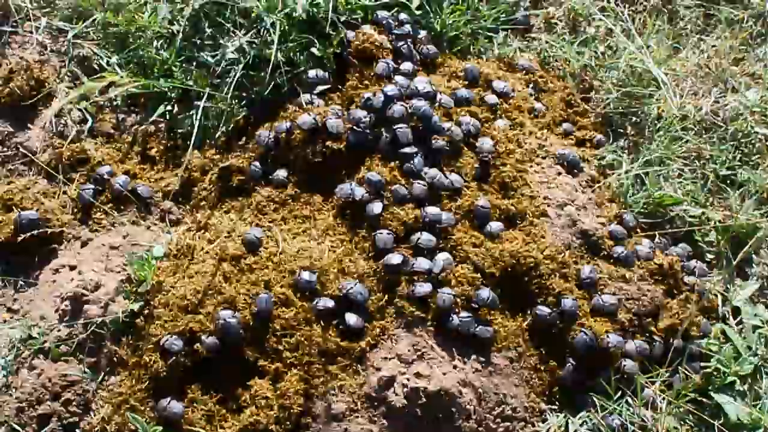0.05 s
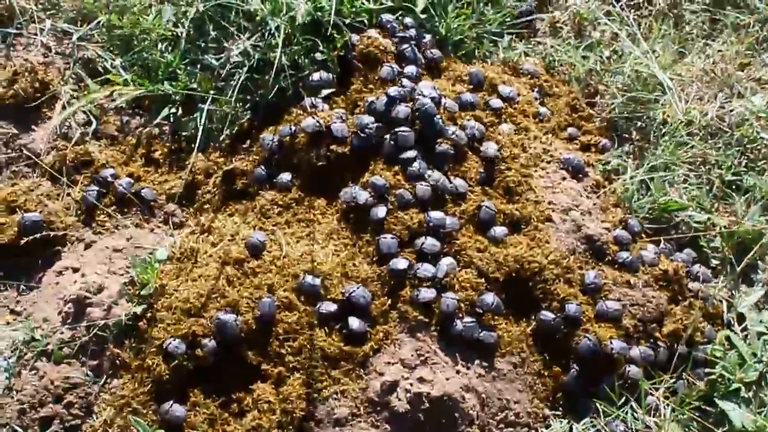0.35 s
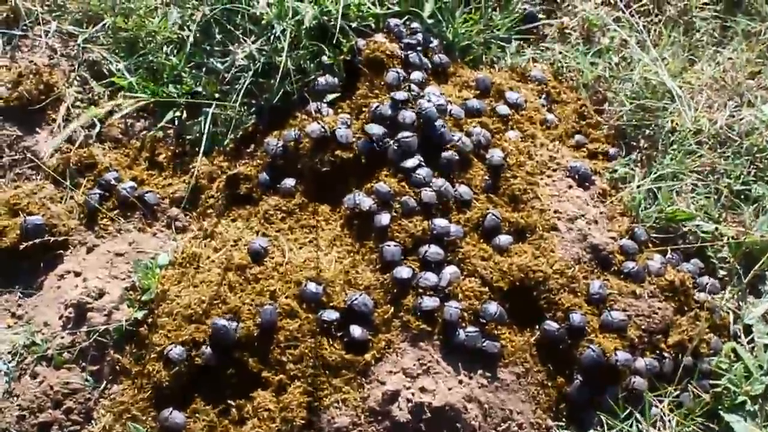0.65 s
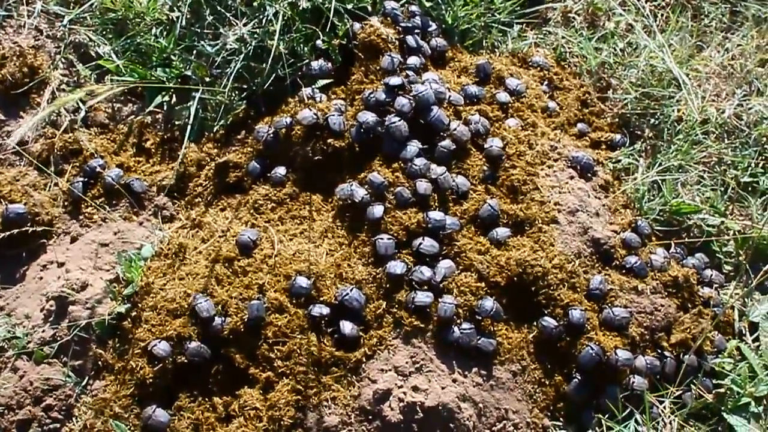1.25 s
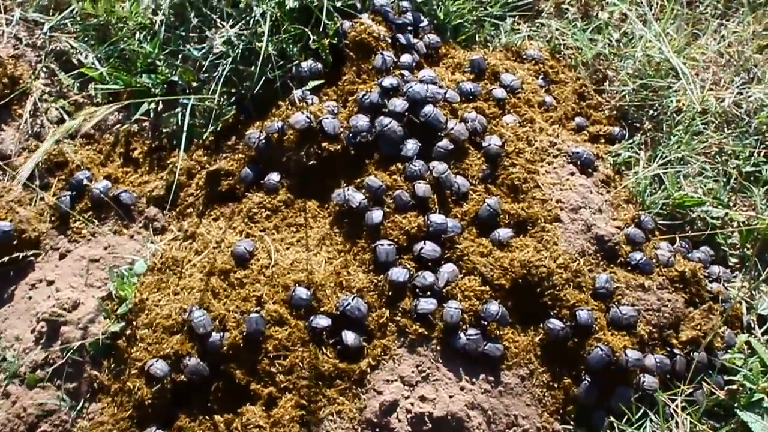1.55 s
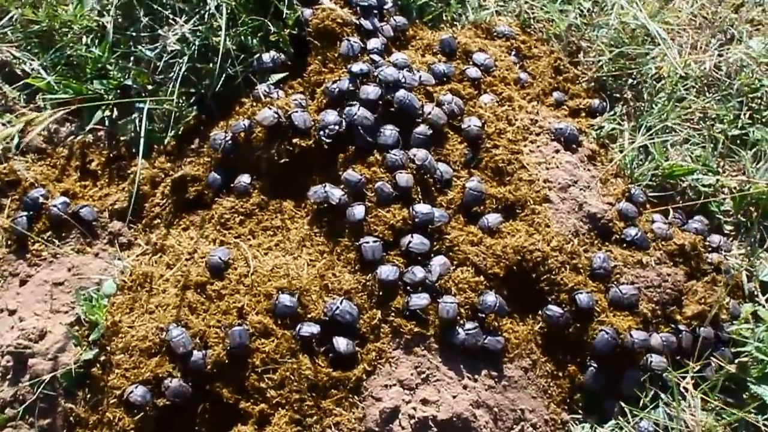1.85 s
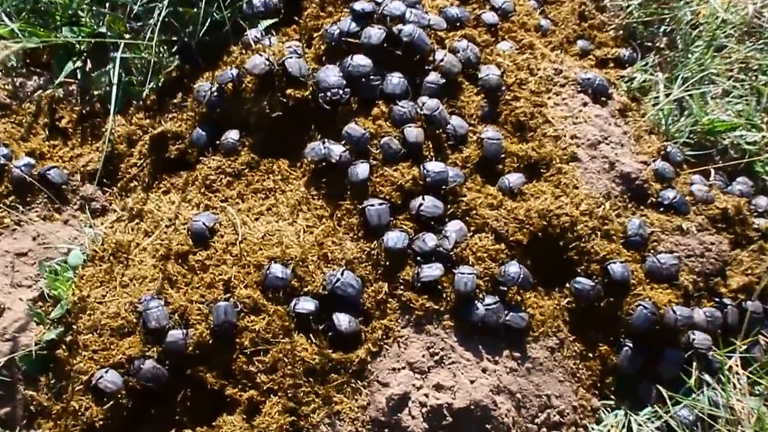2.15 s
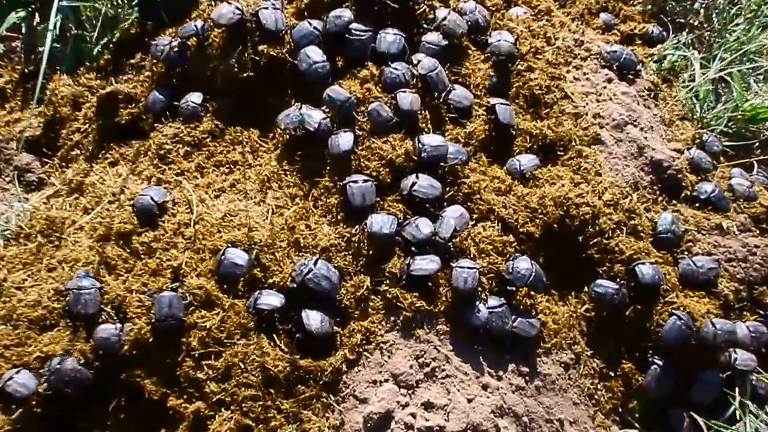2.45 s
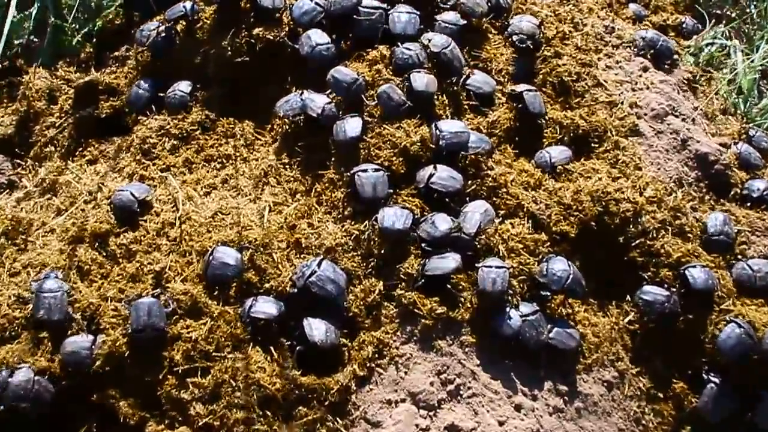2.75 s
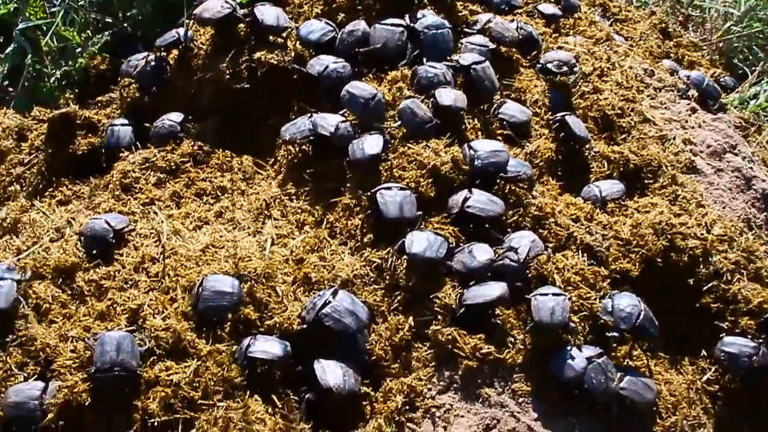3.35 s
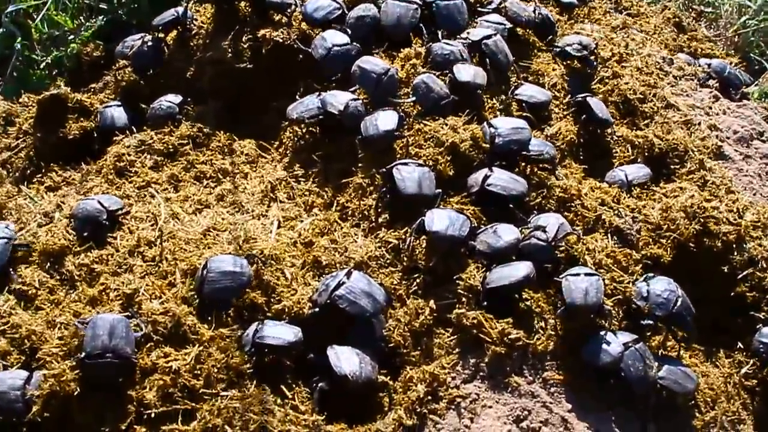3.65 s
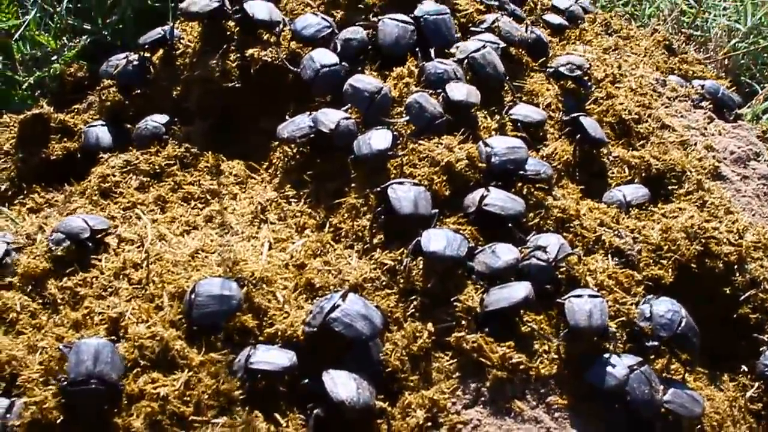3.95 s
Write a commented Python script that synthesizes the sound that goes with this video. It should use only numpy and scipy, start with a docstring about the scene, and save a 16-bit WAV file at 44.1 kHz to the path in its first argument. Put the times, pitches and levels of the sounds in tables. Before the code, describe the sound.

Beetles crawling over dung, faintly ticking and crackling, with dull knocks and light wind.

```python
"""Dung beetles crawl over a heap on open ground, legs and shells ticking over a soft outdoor hiss.
At first wind buffets the microphone, and two small birds chirp faintly, far off.
After a second dry grass rustles up and the wind drops. The hand-held camera's hollow case gives
short dull knocks, most of them in the middle. The last second is left mainly to ticks and crackles."""
import sys
import numpy as np
from scipy import signal
from scipy.fft import rfft, irfft, next_fast_len
from scipy.io import wavfile
from scipy.ndimage import map_coordinates

SR = 44100
rng = np.random.default_rng(int(sys.argv[2]) if len(sys.argv) > 2 else 0)


def unload_audio(sound):
    """Save the sound as a 16-bit wav file, at the path given as the first command line argument."""
    columns = np.transpose(np.atleast_2d(sound))
    # keep every value between -1 and 1, then stretch to whole-number steps
    steps = np.round(np.clip(columns, -1, 1) * 32767)
    wavfile.write(sys.argv[1], SR, steps.astype(np.int16))


N = 176400
T = np.arange(N) / SR
START_S, TOP_HZ = .036, 15900


def amp(db):
    return 10 ** (np.asarray(db) / 20)


def unit(x):
    return x / np.sqrt(np.mean(x ** 2) + 1e-20)


def fade(t, t60):
    return np.exp(-np.log(1000) * t / t60)


def curve(rows):
    """One value per sample from (time_s, value) rows."""
    return np.interp(T, *np.transpose(rows))


def wobble(rate):
    """A smooth random curve, rate knots a second."""
    return map_coordinates(rng.standard_normal(int(N * rate / SR) + 4), [T * rate])


def colour(points):
    """An EQ curve through (freq_hz, gain_db) points."""
    f, db = np.transpose(points)
    return lambda hz: amp(np.interp(np.log(hz + 1), np.log(f + 1), db))


def band(centre_hz, octaves):
    """A bell-shaped band-pass curve."""
    return lambda hz: np.exp(-.5 * (np.log2((hz + 1) / centre_hz) / octaves) ** 2)


def filtered(x, eq):
    m = next_fast_len(len(x) + SR // 10)
    return irfft(rfft(x, m) * eq(np.fft.rfftfreq(m, 1 / SR)), m)[:len(x)]


def noise(eq, size=N):
    """Coloured noise of rms 1."""
    return unit(filtered(rng.standard_normal(size), eq))


def burst(eq, envelope):
    """Coloured noise under an envelope, with the envelope's energy."""
    return unit(noise(eq, len(envelope)) * envelope) * np.sqrt(np.mean(envelope ** 2))


def impulse(eq, size):
    """A minimum-phase click of energy 1, coloured by this EQ."""
    cepstrum = irfft(np.log(eq(np.fft.rfftfreq(size, 1 / SR)) + 1e-6), size)
    cepstrum[1:size // 2] *= 2
    cepstrum[size // 2 + 1:] = 0
    click = irfft(np.exp(rfft(cepstrum)), size)
    return click / np.linalg.norm(click)


def add(out, start_s, sound):
    i = max(0, round(start_s * SR))
    out[i:i + len(sound)] += sound[:max(0, N - i)]


# The clearest ticks of legs and shells: start_s, level_db, pitch_hz
BEETLE_TICKS = [(.115, -28, 7000), (.374, -33, 8000), (.43, -30.5, 4100), (.531, -32, 9000),
                (.975, -29, 7960), (1.404, -23, 12000), (1.4327, -17.5, 11000), (1.493, -23, 10000),
                (1.516, -22, 12000), (1.639, -26, 10000), (1.871, -30, 10000), (2.0498, -25, 3500),
                (2.2032, -29, 5750), (2.2985, -29.5, 6500), (2.7, -22.5, 2580), (2.7103, -19.5, 3600),
                (3.1776, -35, 5000), (3.2258, -29, 13000), (3.2735, -24.5, 9000), (3.3448, -31, 5000),
                (3.4595, -24, 8650), (3.4845, -26, 11000), (3.4997, -26.5, 5070), (3.568, -27, 3920),
                (3.8088, -27, 4140), (3.8405, -27, 6760), (3.926, -26, 5860)]


def beetles(crackles_per_s=130, growth_db=3.5):
    """Legs and shells snap and scrape on dry fibres: a few clear ticks among many faint ones."""
    out, t = np.zeros(N), np.arange(SR // 50) / SR

    def tick(pitch_hz):
        eq = lambda f: band(pitch_hz, octaves=1.09)(f) + amp(-27)
        scrape = burst(eq, fade(t, t60=.019))
        return amp(6.5) * impulse(eq, len(t)) + amp(-13) * scrape

    for start_s, level_db, pitch_hz in BEETLE_TICKS:
        add(out, start_s, amp(level_db) * tick(pitch_hz))
    for when, faintness, height in rng.random((int(crackles_per_s * N / SR), 3)):
        level_db = -48 + growth_db * when - 4 * np.log(faintness + .038)
        pitch_hz = 4000 * 4 ** height
        add(out, when * N / SR, amp(level_db) * tick(pitch_hz))
    return out


# Knocks on the case: start_s, body_db, snap_db, ring_db, pitch_hz
CASE_KNOCKS = [(0.1318, -25.5, -25.5, -41.5, 690), (.581, -25.5, -28, -43, 690),
               (1.426, -19, -27.5, -42.5, 686), (1.5079, -34, -29, -55, 1200),
               (1.7752, -20.5, -21.5, -37, 710), (1.789, -25.5, -34, -46, 730),
               (1.805, -27, -39, -40.5, 800), (1.813, -33, -35, -51, 805), (1.8315, -23, -33, -39.5, 890),
               (1.8543, -39, -38, -64, 1100), (2.111, -34.5, -48, -65, 950),
               (2.3838, -17.5, -22, -32.5, 560), (2.7324, -21, -28, -37.5, 1030),
               (2.7907, -27, -35.5, -39, 1050), (2.8228, -33, -30, -57, 920),
               (2.9525, -23, -32, -45.5, 870), (2.989, -22, -41, -53, 960)]
# EQ of the dull body and of the bright snap: freq_hz, gain_db
BODY_EQ = [(60, -42), (170, -5), (380, -10), (550, 1.5), (760, -1), (950, 0), (1200, -2), (1400, -12),
           (2100, -10.5), (2700, -30), (7000, -23)]
SNAP_EQ = [(200, -28), (700, -18), (1500, -3.5), (2100, -0.5), (2700, -5), (3200, 1), (3700, 0.5),
           (4150, -1), (4600, -3), (6000, -11.5), (9500, -15.5), (15000, -20)]
# Resonances of the hollow case: pitch_hz, level_db, t60_s
RING_MODES = [(152, 1, 0.072), (249.7, 1.5, 0.079), (541, -6.5, .07), (728, -6, 0.056), (898, -10, 0.056),
              (2103, -2.5, 0.032), (3480, 5, 0.014)]


def case_knocks(snap_delay_s=.0007, attack_s=.0012):
    """A damped push on the case, pitched by the spot touched, then a snap; the hollow case rings on."""
    out, t = np.zeros(N), np.arange(SR // 10) / SR
    attack = 1 - np.exp(-(t / attack_s) ** 2)

    def hit(eq, tail_db, t60):
        tail = burst(eq, attack * fade(t, t60))
        return amp(14.5) * impulse(eq, len(t)) + amp(tail_db) * tail

    for start_s, body_db, snap_db, ring_db, pitch_hz in CASE_KNOCKS:
        spot_eq = lambda f: colour(BODY_EQ)(f) * (band(pitch_hz, octaves=.78)(f) + .11)
        body = hit(spot_eq, tail_db=-10.5, t60=.035)
        snap = hit(colour(SNAP_EQ), tail_db=-6.5, t60=.028)
        ring = np.zeros(len(t))
        for hz, db, t60 in RING_MODES:
            decay = amp(db + rng.normal(0, 1.7)) * fade(t, t60)
            ring += decay * np.sin(2 * np.pi * (hz * t + rng.random()))
        add(out, start_s, amp(ring_db) * attack * ring - amp(body_db) * body)
        add(out, start_s + snap_delay_s, amp(snap_db) * snap)
    return out


def case_smear(x, top_delay_s=.001628):
    """Each frequency crosses the case at its own speed, which softens the transients."""
    return filtered(x, lambda hz: np.exp(-1j * np.pi * top_delay_s * hz ** 2 / TOP_HZ))


# Gusts on the microphone: time_s, level_db
GUST_LEVEL = [(0, -62), (.1, -46), (.19, -56), (.36, -36), (.48, -37), (.62, -33), (.76, -40.5),
              (.89, -57.5), (1.02, -47.5), (1.25, -47.5), (1.4, -58), (1.7, -66.5), (3.3, -67), (3.7, -53),
              (4, -63)]
# EQ of their rumble: freq_hz, gain_db
RUMBLE_EQ = [(20, -13), (45, -0.5), (80, 2), (120, -3.5), (180, -10.5), (260, -15.5), (400, -31),
             (800, -58)]
# Single eddies that thump the microphone: centre_s, level_db, pitch_hz
EDDY_THUMPS = [(0.084, -28, 77), (.112, -34, 99), (0.255, -35, 96), (0.3, -26, 81), (.329, -31, 171),
               (0.361, -19.5, 203), (.376, -18.5, 111.5), (.396, -28, 110), (.428, -21, 138),
               (.508, -16, 129), (.526, -25, 85), (0.541, -19.5, 136), (0.621, -28, 230), (0.65, -19, 83),
               (.668, -27, 80), (0.713, -20.5, 113), (.746, -21.5, 84), (0.982, -28.5, 154),
               (1.0016, -16.5, 145), (1.034, -23, 144), (1.147, -32, 98), (1.188, -30.5, 77),
               (1.211, -36, 131), (1.256, -29, 120), (3.458, -40, 111)]


def wind(width_cycles=.74):
    """A lumpy rumble on the microphone; eddies are short pressure swings with a turbulent edge."""
    rumble = unit(noise(colour(RUMBLE_EQ)) * amp(2.5 * wobble(25.13)))
    out = amp(curve(GUST_LEVEL)) * rumble
    t = np.arange(-SR // 10, SR // 10) / SR
    for centre_s, level_db, pitch_hz in EDDY_THUMPS:
        cycles = t * pitch_hz
        edge = amp(-15) * noise(band(1.71 * pitch_hz, octaves=.35), len(t))
        swing = np.cos(2 * np.pi * cycles + rng.normal(0, .95))
        swell = amp(level_db) / (1 + (cycles / width_cycles) ** 2) ** 2
        out += np.interp(T, centre_s + t, swell * (swing + edge), 0, 0)
    return out


# Swells of the dry rustle and of its top-end fizz: time_s, level_db
RUSTLE_LEVEL = [(0.04, -54), (.85, -54.5), (1.0, -47), (1.15, -44.5), (1.4, -43), (1.65, -48.5), (2.0, -46),
                (2.16, -50), (2.4, -50.5), (2.65, -47.5), (3.02, -52.5), (3.5, -51), (4, -51.5)]
FIZZ_LEVEL = [(0, -68), (.95, -68), (1.25, -55), (1.7, -67), (2.6, -62.5), (4, -56)]
# EQ of the rustle: freq_hz, gain_db
RUSTLE_EQ = [(300, -11.5), (1200, 1), (2500, 0), (4000, 2), (6500, -1.5), (10500, 0.5), (13500, -1.5),
             (16000, -4.5)]
# Brushes through grass and crumbs: centre_s, half_length_s, level_db, pitch_hz, width_octaves
GRASS_BRUSHES = [(1.166, 0.12, -47.5, 7900, 0.74), (1.508, 0.039, -41, 9200, 1),
                 (1.513, 0.081, -46, 1070, 1), (1.972, 0.032, -45.5, 1930, 0.52),
                 (2.06, 0.049, -48, 1530, 0.84), (1.964, 0.01, -40, 12500, 0.85),
                 (1.966, 0.0061, -41.5, 6500, .22), (2.3, 0.03, -56, 2900, 1),
                 (3.25, 0.02, -52.5, 12000, 0.44)]


def grass():
    """Dry grass rustles: a swelling hiss, a crisp fizz on top and a few gritty brushing strokes."""
    rustle = amp(curve(RUSTLE_LEVEL) + wobble(40)) * noise(colour(RUSTLE_EQ))
    fizz = unit(noise(band(12700, octaves=.16)) * amp(7 * wobble(1200)))
    out = rustle + amp(curve(FIZZ_LEVEL)) * fizz
    for centre_s, half_length_s, level_db, pitch_hz, octaves in GRASS_BRUSHES:
        stroke = np.exp(-.5 * ((T - centre_s) / half_length_s) ** 2)
        grit = unit(noise(band(pitch_hz, octaves)) * amp(3.5 * wobble(600)))
        out += amp(level_db) * stroke * grit
    return out


def whistle(progress, hz, rough_hz=120):
    """A slightly rough tone that swells and fades as progress runs from 0 to 1."""
    phase = 2 * np.pi * np.cumsum(hz + rough_hz * wobble(300)) / SR
    return np.sin(np.pi * progress) * np.sin(phase)


def chirping_bird(count=12, first_s=.243, every_s=.1478, length_s=.032, fall_hz=860):
    """One bird repeats thin chirps that hold, then hook downward, the last one louder."""
    out = np.zeros(N)
    for k in range(count):
        progress = np.clip((T - first_s - k * every_s) / length_s, 0, 1) ** 2
        level_db = rng.normal(-51.5, 1.5) + 5.5 * (k == count - 1)
        pitch_hz = rng.normal(5350, 68.7) - fall_hz * progress ** 3
        out += amp(level_db) * whistle(progress, pitch_hz)
    return out


# The second bird's slurs: start_s, level_db, start_hz, end_hz
BIRD_SLURS = [(0.041, -51, 5300, 3980), (.068, -53.5, 4620, 5730), (.098, -57, 5150, 3950),
              (.618, -58, 4180, 5420)]


def slurring_bird(length_s=.03, lower_voice_ratio=.8):
    """Another bird whistles a few quick glides in two voices at once."""
    out = np.zeros(N)
    for start_s, level_db, start_hz, end_hz in BIRD_SLURS:
        progress = np.clip((T - start_s) / length_s, 0, 1)
        hz = start_hz + (end_hz - start_hz) * progress
        out += amp(level_db) * (whistle(progress, hz) + whistle(progress, lower_voice_ratio * hz))
    return out


def bush_echo(x, wet_db=-4):
    """Bushes scatter a far sound, adding a short diffuse tail."""
    t = np.arange(SR // 5) / SR
    tail = rng.standard_normal(len(t)) * fade(t, t60=.17)
    return x + amp(wet_db) * signal.fftconvolve(x, tail / np.linalg.norm(tail))[:N]


# Rise and fall of the outdoor bed: time_s, level_db
AIR_LEVEL = [(0, -57.5), (1.5, -55.5), (1.7, -51), (2.05, -48.5), (2.3, -49.5), (2.9, -53.5), (3.25, -52),
             (4, -54.5)]
# EQ of the bed: freq_hz, gain_db
AIR_EQ = [(30, -12), (70, -9), (150, -6), (270, 1.5), (360, -2.5), (500, -3.5), (720, -3), (1050, -3),
          (1600, -11), (3000, -14.5), (8000, -56)]


def air(waver_db=1.1):
    """The soft, distant rush of open country."""
    return amp(curve(AIR_LEVEL) + waver_db * wobble(9.6)) * noise(colour(AIR_EQ))


def scene():
    """Close ticks and knocks over wind, grass, air and far birds, in mono."""
    close = case_smear(case_knocks() + beetles())
    outdoors = wind() + air() + grass()
    birds = bush_echo(chirping_bird() + slurring_bird())
    return (close + outdoors + birds)[None]


def record(dry):
    """The sound cuts in after an instant of silence, with nothing above the camera's band limit."""
    return filtered(dry[0] * (T > START_S), lambda hz: hz < TOP_HZ)[None]


dry = scene()
out = record(dry)
unload_audio(out)
```